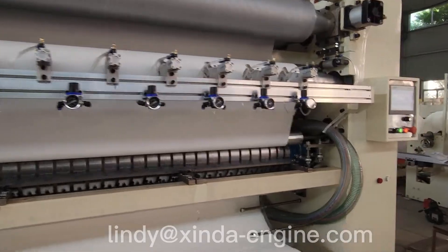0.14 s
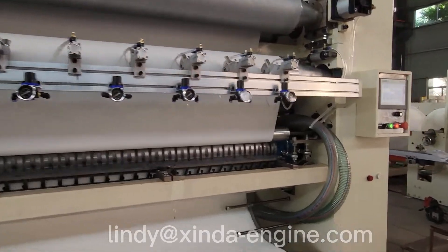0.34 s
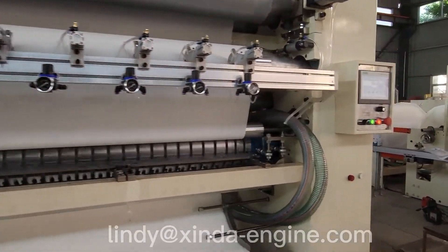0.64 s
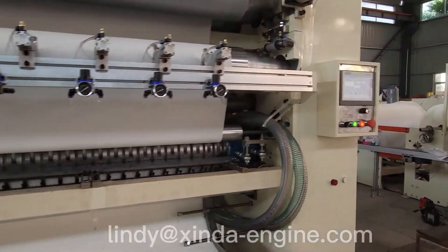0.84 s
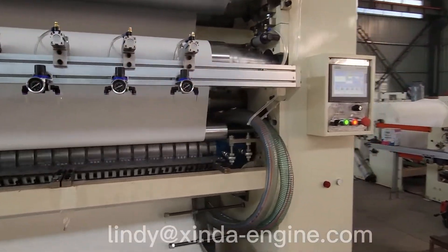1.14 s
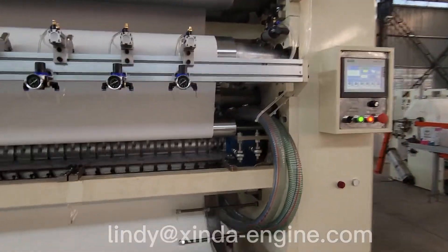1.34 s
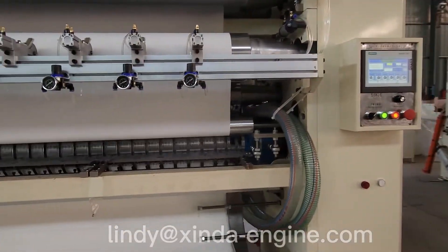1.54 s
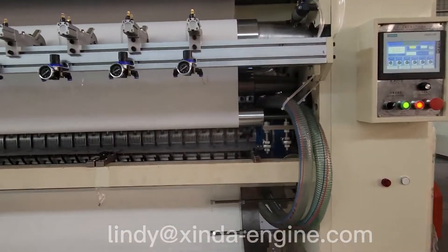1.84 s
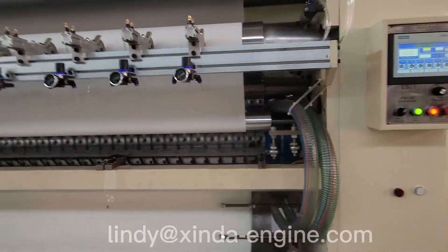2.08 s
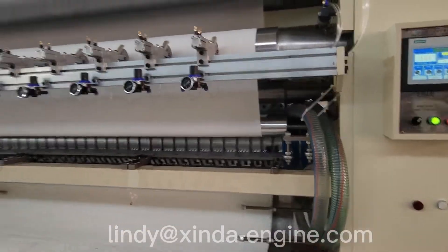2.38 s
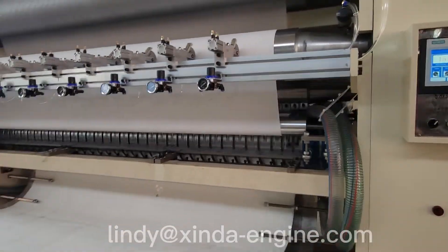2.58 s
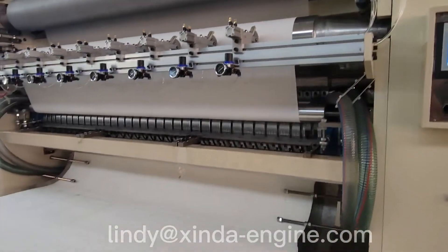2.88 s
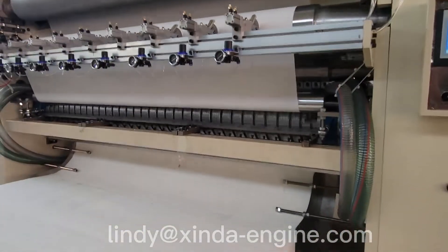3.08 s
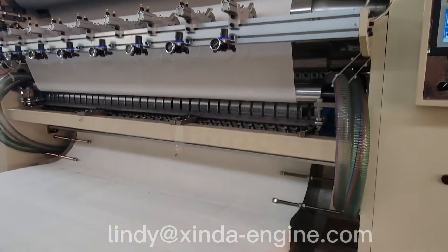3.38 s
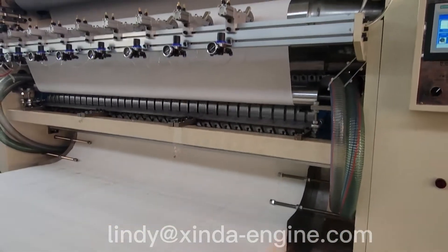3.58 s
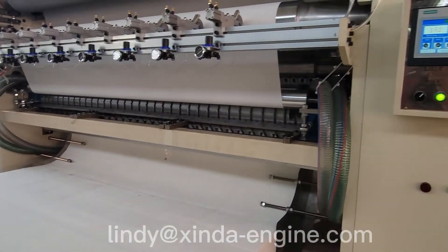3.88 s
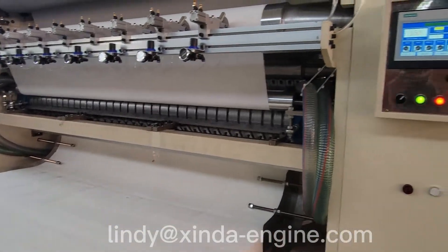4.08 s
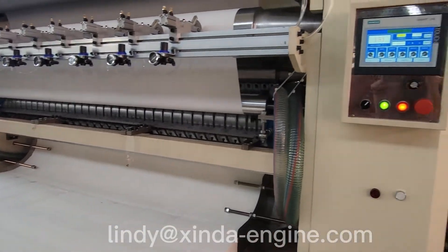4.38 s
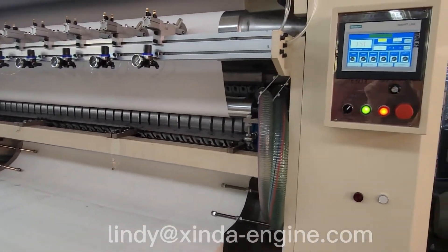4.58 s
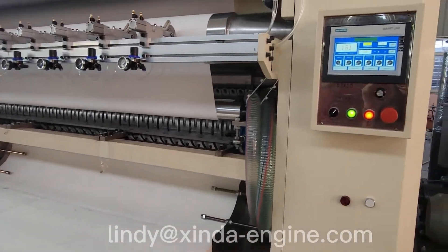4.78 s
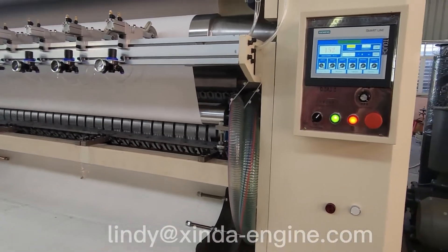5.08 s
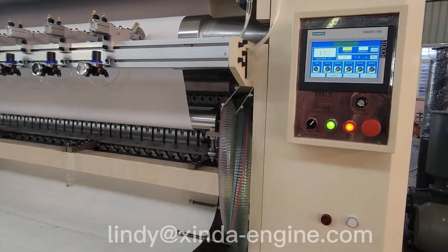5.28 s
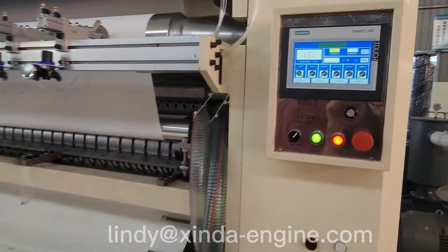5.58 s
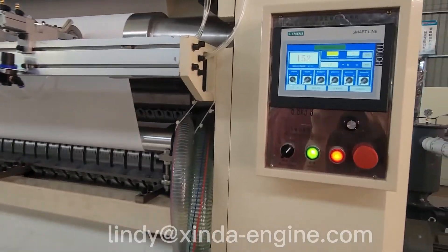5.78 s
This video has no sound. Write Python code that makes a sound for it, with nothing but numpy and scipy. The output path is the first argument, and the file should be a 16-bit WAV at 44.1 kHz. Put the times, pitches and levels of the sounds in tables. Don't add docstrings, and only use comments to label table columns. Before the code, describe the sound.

A large tissue folding machine is already running at full speed and never stops or changes pace over about six seconds. A loud vacuum blower holds one low, buzzing pitch, its overtones fading and swelling differently at left and right as a hand-held phone moves along. About eight times a second each fold brings a dull valve thump, a crisp knife snick, gritty paper shear, a suction hiss and short steel clanks. One clank jumps out at about 0.2 seconds. Thumps and gripper jaws are strongest around 1 second; through 2 to 4 seconds the thumps recede while other metal clatter comes closer. Rolls rumble in a cycle repeating every half second, with midrange gear rumble swelling at times. From about 4.5 seconds the puffs gain a thin, high whistling edge. Leaking air, faint motor tones, broad roar and diffuse hall echo remain behind throughout.

```python
import sys
import numpy as np
from scipy import signal
from scipy.fft import rfft, irfft
from scipy.io import wavfile
from scipy.ndimage import uniform_filter1d

SR = 44100
rng = np.random.default_rng(int(sys.argv[2]) if len(sys.argv) > 2 else 0)


def bounce(signal):
    frames = np.transpose(np.atleast_2d(signal))
    limited = np.clip(frames, -1, 1)
    pcm = np.round(limited * 32767).astype(np.int16)
    wavfile.write(sys.argv[1], SR, pcm)


def ratio_of_db(decibels):
    return 10 ** (np.asarray(decibels, float) / 20)


N = 261513
T = np.arange(N) / SR

FOLD_S, FOLDS_PER_TURN = .1229, 4
TURN_S = FOLD_S * FOLDS_PER_TURN
LOBE_HZ = 82.72
ROAR_DB, RUMBLE_DB, GEAR_DB = -24.5, -28.5, -29.5

# [left level/dB, right level/dB]
STRONG_ORDERS = [(-14.5, -13.5), (-20.5, -21), (-28.5, -32.5), (-22, -19.5)]
# [t/s, half-width/s, left level/dB, right level/dB]
STANDING_WAVES = [
    [(1.01, 0.33, -4, -8.5), (1.2, 0.97, -4.5, -2), (0.6, 0.28, 1.5, -4), (5.78, .45, -1.5, -3.5)],
    [(.05, 0.19, -1.5, 0.5), (1.16, 0.32, -1, 6.5), (3.1, 1.1, -3, -5), (4.2, 1.03, -4.5, -23),
     (3.3, .45, -5.5, -1), (5.75, 0.23, 1, 1)],
    [(.8, 1.6, -10, -4.5), (1.6, 0.25, -13, .1), (2.7, 1.1, -1.5, 6.5)],
    [(0.5, 0.98, -11, -3), (0.17, 0.32, -6, -5), (1.9, 0.19, 2, 4), (1.72, 0.2, -7, -1.3),
     (2.27, 0.16, -4, -6), (3.05, 0.58, -9.5, -1.3), (3.96, 0.38, -0.5, -5.5), (5.33, 0.44, 3, 1.5),
     (5.95, 0.15, -3, -7)],
]
# [strong order index 0-3, port 0 left 1 right, t/s, half-width/s]
PHASE_FLIPS = [
    (1, 1, .48, .16),
    (1, 0, .74, .15),
    (3, 0, 2.4, .15),
]
PHASE_LEADS = [(.1, .25, .03), (.9, -1.0, 0), (-1.5, -.9, 3.3), (1.2, 1.2, -6.8)]
# [order, start level/dB, middle level/dB, end level/dB]
WEAK_ORDERS = [(1, -42, -46, -48), (3, -37, -41, -39), (5, -41, -41, -38), (9, -47, -45, -47),
               (10, -46, -42, -43), (12, -49, -49, -49), (16, -48, -49, -50), (20, -58, -46, -38),
               (24, -47, -47, -47), (32, -56, -54, -54)]
# [t/s, extra delay/ms]
PATH_DELAY = [(0, 1.1), (1.5, 1.2), (3.0, 0), (3.6, 0), (5.93, -2.1)]
# [t/ms, level/dB, f/Hz, t60/s, sign]
VALVE_POPS = [
    (116.5, 0, 125, .024, 1),
    (58, -6, 150, .018, -1),
    (67, -9, 95, .032, -1),
    (34.5, -12, 90, .04, -1),
    (93, -7, 200, .012, -1),
    (9.5, -15, 64, .08, 1),
    (114, -15, 42, .05, 1),
    (57, -17, 45, .05, 1),
    (87, -15, 90, .03, 1),
]
# [start/ms, rise/ms, hold/ms, fall/ms, then level/dB at each of STROKE_HZ]
STROKES = [
    (92.7, 3, 26.9, 6, 0.5, 1, 3.5, 3.5, 4.5, 3.5),
    (35.5, 6.7, 2, 12.7, 0.5, 1, 7.5, 9, 9, 0.5),
    (34.1, 1, 3.2, 5.1, 4, -7, 5, -18, -8, -13),
    (2.5, 0.59, 0.56, 1.8, -1, -0.5, 14, -10, 9.5, 7),
    (68.9, 2.3, 1.7, 7.9, -1, 2, -7, -27, -3, 4),
]
STROKE_HZ = [1500, 2200, 4500, 9000, 12500, 15000]
# [f/Hz, level/dB per Hz]
HISS_COLOUR = [(650, -40), (1100, -5), (1580, -6.5), (1960, -0.5), (2150, -5), (3230, -16.5), (4430, -23.5),
               (5620, -20), (7220, -25.5), (9150, -15.5), (10800, -25), (13000, -15.5), (15100, -16.5),
               (15800, -19), (16500, -47)]
CLANK_TURN = {"jaws": [(93.5, -12.5, 1960), (461.5, -13, 1950)], "fingers": [(219, -17.5, 2170),
              (343, -21.5, 2210)], "cams": [(44.8, -17.5, 1955), (167.8, -18.5, 1960), (290.5, -11.5, 1960),
              (413.5, -17, 1945)], "stops": [(3, -21.5, 1990), (125, -24, 1960), (249, -19, 1970),
              (372, -19, 1975), (438, -24, 1800)], "latches": [(111, -19, 1540), (235, -13.5, 1520)]}
SLACK_MS = {"jaws": .8, "fingers": .8, "cams": .8, "stops": 2.5, "latches": .6}
# [t/s, extra level/dB]
ACCENTS = [(.095, 2), (.237, 19), (.297, 3), (.463, -3.5), (.955, 3), (2.186, 3), (2.258, 2), (2.692, 2),
           (4.153, 2), (4.888, 3), (5.136, 1.5), (5.378, 2)]
PASSAGES = {"valves": (1.0, 0.96, -24.5, -32), "hiss": (0.5, -1, -32.5, -31.5),
            "bite": (-0.2, 1.8, -2.6, -14), "whistle": (5.5, 1.3, 8, -13), "hoses": (2.5, 0.8, -58, -43.5),
            "echo": (2, 1, -6, -5.5), "jaws": (1, 1.05, 0, -10), "fingers": (3, 0.8, -14, -2.2),
            "cams": (3, 1.5, -1.5, -9), "stops": (1.5, 2.5, -0.7, -5), "latches": (3.5, 1.8, -2.5, -25)}
# [t/s, half-width/s, roll rumble level/dB, gear rumble level/dB]
SWELLS = [(0.01, 0.34, -3.5, 0), (1.5, 0.9, 1, -1), (1.9, 0.12, .1, 6.5), (2.5, 0.61, -1, 3.5),
          (3.65, .17, 4.5, 1.5), (4.35, 0.22, 0.8, 4), (4.95, 0.35, 0, 3), (5.45, 0.2, 4.5, -1)]
# [f/Hz, level/dB per Hz]
RUMBLE_COLOUR = [(60, -30), (150, -14), (210, -3), (280, -3), (400, -4), (520, -14), (700, -30)]
# [f/Hz, level/dB per Hz]
GEAR_COLOUR = [(500, -29), (700, 0.5), (850, 12), (1000, 5.5), (1300, -37)]
# [f/Hz, level/dB per Hz]
LEAK_COLOUR = [(2200, -18), (3300, -1), (4500, 4), (6000, -5), (7500, -16)]
# [f/Hz, level/dB per Hz]
ROAR_COLOUR = [(25, -22), (60, -1.5), (200, -3), (400, -8.5), (570, -6.5), (850, -7), (1200, -12),
               (1600, -17), (1970, -9.5), (2500, -16.5), (4500, -30.5), (7100, -43), (9100, -43),
               (10800, -54), (12800, -35), (15500, -37)]
# [f/Hz, level/dB, left lead/rad]
MOTOR_TONES = [(689.5, -37, 2.2), (1093.5, -46, 1.5)]
# [f/Hz, correlation -1..1]
LIKENESS = [(25, .9), (60, .96), (130, .97), (290, .72), (640, .1), (1100, -.55), (1700, -.1), (15000, 0)]
# [f/Hz, level/dB]
LEFT_LEAN = [(60, 0.0), (110, 0.0), (200, -0.5), (380, 0.5), (700, 0), (1290, -3.5), (2380, 6),
             (4400, -2.5), (8120, 5), (15000, 6)]


def curve(table):
    s, *cols = np.transpose(table)
    return [np.interp(T, s, c) for c in cols]


def shape(table, size):
    hz, value = np.transpose(table)
    bins_hz = np.fft.rfftfreq(size, 1 / SR)
    return np.interp(np.log(bins_hz + 1), np.log(hz), value)


def unit(x):
    return x / np.sqrt(np.mean(x ** 2))


def noise(table, size=N):
    mid, side = rfft(rng.standard_normal((2, size)))
    like = np.clip(shape(LIKENESS, size), -.99, .99)
    pair = np.sqrt(1 + like) * mid + np.sqrt(1 - like) * side * np.array([[1], [-1]])
    return irfft(pair * ratio_of_db(shape(table, size)), size)


def walk(rate_hz):
    k = int(SR / rate_hz)
    steps = np.repeat(rng.standard_normal(N // k + 1), k)
    slewed = uniform_filter1d(uniform_filter1d(steps, k), k)
    return unit(slewed[:N])


def bell(s, half_s, t=T):
    return np.exp(-np.abs((t - s) / half_s) ** 3.8)


def bumps(rows):
    return sum(np.outer(db, bell(s, half_s)) for s, half_s, *db in rows)


def near(part, t=T):
    s, half_s, abreast_db, away_db = PASSAGES[part]
    return away_db + (abreast_db - away_db) * bell(s, half_s, t)


def folds():
    return (T - curve(PATH_DELAY)[0] / 1000) / FOLD_S


def flips(k):
    gain = np.ones((2, N))
    for order, port, s, half_s in PHASE_FLIPS:
        if order == k:
            gain[port] *= np.tanh((T - s) / half_s)
    return gain


def blower():
    turn = 2 * np.pi * (LOBE_HZ * T + .012 * walk(1.5))
    out = np.zeros((2, N))
    for k, order in enumerate((2, 4, 6, 8)):
        left_db, right_db = bumps(STANDING_WAVES[k]) + np.array(STRONG_ORDERS[k])[:, None]
        lead = np.interp(T / T[-1], [0, .44, 1], PHASE_LEADS[k])
        flutter = ratio_of_db(.25 * k * walk(24.77) + .084 * walk(22))
        left = ratio_of_db(left_db) * np.sin(order * turn + k + lead / 2)
        right = ratio_of_db(right_db) * np.sin(order * turn + k - lead / 2)
        out += np.sqrt(2) * flutter * flips(k) * np.array([left, right])
    for order, *ends_db in WEAK_ORDERS:
        db = np.interp(T / T[-1], [0, .5, 1], ends_db)
        for ch in out:
            level = ratio_of_db(db + 1 + 2 * walk(2))
            ch += np.sqrt(2) * level * np.sin(order * turn + .06 * order * walk(1))
    return out


def valves():
    out, count = np.zeros(N), folds()
    for ms, db, hz, t60_s, sign in VALVE_POPS:
        since = count - ms / 1000 / FOLD_S
        age_s = since % 1 * FOLD_S
        scatter_db = .7 * rng.standard_normal(64)
        size = ratio_of_db(db + scatter_db[np.floor(since).astype(int) + 2])
        envelope = (1 - np.exp(-age_s / .0018)) * 1000 ** (-age_s / t60_s)
        out += sign * size * np.sin(2 * np.pi * hz * age_s) * envelope
    return unit(out)


def stroke(start_ms, rise_ms, hold_ms, fall_ms, scatter_db):
    since = folds() - start_ms / 1000 / FOLD_S
    age_ms = since % 1 * FOLD_S * 1000
    index = np.floor(since).astype(int) + 2
    chance = rng.standard_normal(64)
    size = ratio_of_db(scatter_db * (chance[index] + chance[index % FOLDS_PER_TURN]))
    fall = np.exp(-np.maximum(age_ms - rise_ms - hold_ms, 0) / fall_ms)
    return size * np.clip(age_ms / rise_ms, 0, 1) * fall


def knives_and_suction(bite_db, whistle_db):
    out, scale = 0, np.std(noise(HISS_COLOUR + [(SR / 2, -60)]))
    for start_ms, rise_ms, hold_ms, fall_ms, *tilt_db in STROKES:
        colour = [(f, db + np.interp(np.log(f), np.log(STROKE_HZ), tilt_db)) for f, db in HISS_COLOUR]
        gate = stroke(start_ms, rise_ms, hold_ms, fall_ms, .6)
        grit = ratio_of_db(1.7 * walk(350))
        out = out + gate * grit * noise(colour) / scale
    whistle = unit(noise([(10000, -30), (12200, -6), (12650, 0), (13300, -8), (15500, -17)]))
    bite = unit(noise([(2500, -13), (3500, -9), (5600, 7), (7000, 5), (9000, -12), (15000, -6)]))
    out = out + ratio_of_db(bite_db + 2) * stroke(93, 1.5, 3, 4, 1.2) * bite
    return out + ratio_of_db(whistle_db - 4.5) * stroke(94, 1.8, 7, 3, .8) * whistle


def clank_list():
    rows = []
    for part, slots in CLANK_TURN.items():
        for ms, db, hz in slots:
            c = rng.standard_normal((13, 3)).T
            s = np.arange(13) * TURN_S + ms / 1000
            s = s + (np.interp(s, *np.transpose(PATH_DELAY)) + SLACK_MS[part] * c[0]) / 1000
            extra_db = sum(boost * (abs(s - at) < .006) for at, boost in ACCENTS)
            level_db = db + extra_db + near(part, s) + .87 * c[1]
            rows += zip(s, level_db, hz + 30.2 * c[2])
    return [r for r in rows if 0 < r[0] < T[-1]]


def grippers(pan_db):
    out, age_s = np.zeros((2, N + 4000)), np.arange(4000) / SR
    clanks = clank_list()
    chance = rng.standard_normal((200, 4))
    t60_s = [[.036], [.016], [.016]]
    for (s, db, hz), c in zip(clanks, chance):
        crack = np.diff(rng.standard_normal((2, len(age_s) + 1)))
        crack = ratio_of_db(-17) * crack * np.exp(-age_s / .0038)
        modes_hz = hz * (1 + np.array([0, -.1, .11]) + c[:3] * [.003, .03, .03])[:, None]
        start = int(s * SR)
        for ch, late_s in enumerate((0, .00039 + .00004 * c[3])):
            since_s = np.maximum(age_s - late_s, 0)
            blow = (1 - np.exp(-since_s / .0014)) * 1000 ** (-since_s / t60_s)
            ring = ratio_of_db([[0], [-5], [-6]]) * blow * np.sin(2 * np.pi * modes_hz * since_s)
            out[ch, start:start + len(age_s)] += ratio_of_db(db) * (np.sum(ring, axis=0) + crack[ch])
    return out[:, :N] * ratio_of_db(np.array([[pan_db], [-pan_db]]) / 2)


def rolls():
    size = int(round(TURN_S * SR))
    turn = np.tile(unit(noise(RUMBLE_COLOUR, size)), N // size + 1)[:, :N]
    return unit(turn + .54 * unit(noise(RUMBLE_COLOUR)))


def gears(level_db):
    return ratio_of_db(level_db - 1.5 + 1.5 * walk(18)) * unit(noise(GEAR_COLOUR))


def hoses():
    return ratio_of_db(near("hoses") + 1.5 * walk(30)) * unit(noise(LEAK_COLOUR))


def motors():
    side = np.array([[.5], [-.5]])
    out = np.zeros((2, N))
    for hz, db, lead in MOTOR_TONES:
        out += np.sqrt(2) * ratio_of_db(db + .5 * walk(4.2)) * np.sin(2 * np.pi * hz * T + side * lead)
    return out


def roar():
    return ratio_of_db(ROAR_DB + .5 * walk(2.9)) * unit(noise(ROAR_COLOUR))


def hall(x, t60_s):
    age_s = np.arange(int(t60_s * SR)) / SR
    tail = rng.standard_normal((2, len(age_s))) * 1000 ** (-age_s / t60_s) * (age_s > .006)
    return signal.fftconvolve(x, tail / np.linalg.norm(tail[0]), axes=1)[:, :N]


def scene():
    rumble_db, gear_db = bumps(SWELLS) + [[RUMBLE_DB], [GEAR_DB]]
    pop = ratio_of_db(near("valves") + 3.5) * valves()
    pops = np.array([pop, np.roll(pop, -18)])
    knives = ratio_of_db(near("hiss") + 8.5) * knives_and_suction(near("bite"), near("whistle"))
    clanks = ratio_of_db(10.5) * grippers(pan_db=-4)
    machine = blower() + pops + knives + clanks + ratio_of_db(rumble_db + 2.5) * rolls() + gears(gear_db)
    echo = ratio_of_db(near("echo")) * hall(knives, .5) + hall(ratio_of_db(-16.5) * clanks, .4)
    return machine + hoses() + motors() + roar() + echo


def low_pass(x):
    return signal.sosfilt(signal.butter(12, 17070, fs=SR, output="sos"), x)


def record(dry):
    treble_db = shape(LEFT_LEAN, N) * shape([(2500, 0), (4000, 1)], N)
    ports = irfft(rfft(dry) * ratio_of_db(np.array([treble_db, -treble_db]) / 2), N)
    bass_cut = signal.butter(2, 40, "high", fs=SR, output="sos")
    top_edge = signal.ellip(10, .3, 65, 15700, fs=SR, output="sos")
    ports = signal.sosfilt(bass_cut, ports)
    rounded = np.tanh(.6 * ports) / .6
    return low_pass(signal.sosfilt(top_edge, rounded))


dry = scene()
out = record(dry)
bounce(out)
```